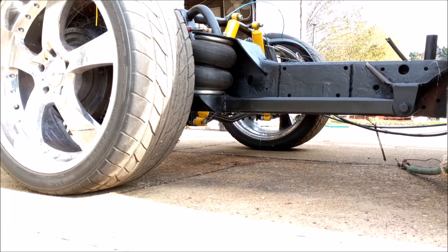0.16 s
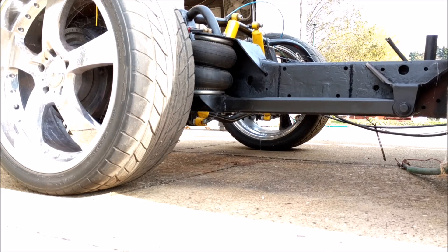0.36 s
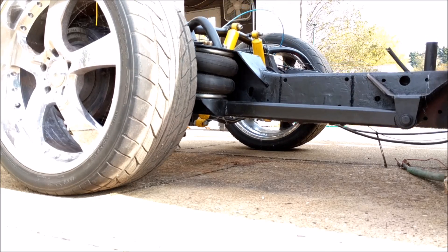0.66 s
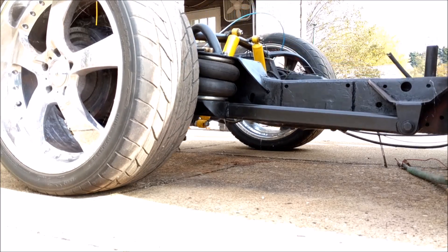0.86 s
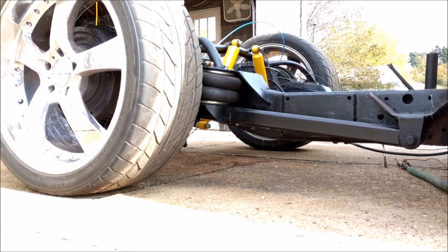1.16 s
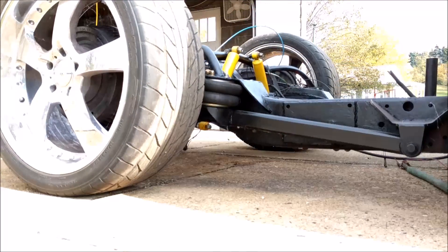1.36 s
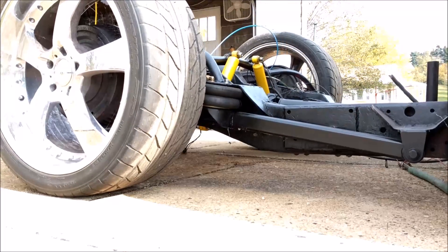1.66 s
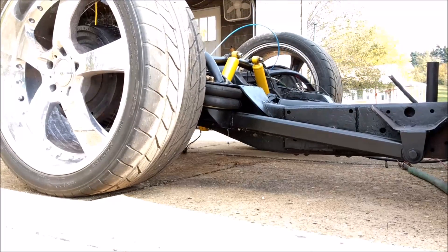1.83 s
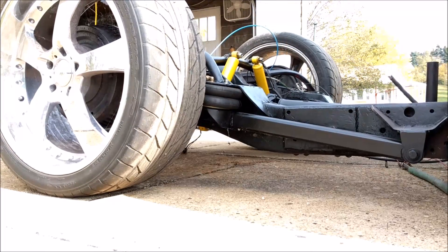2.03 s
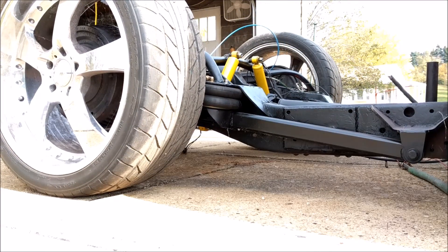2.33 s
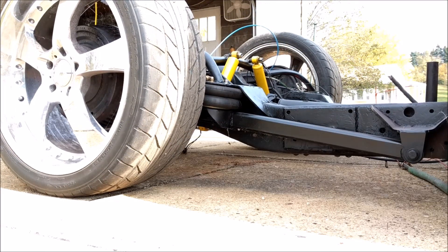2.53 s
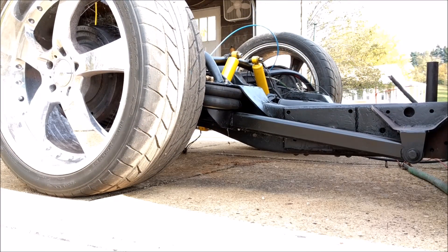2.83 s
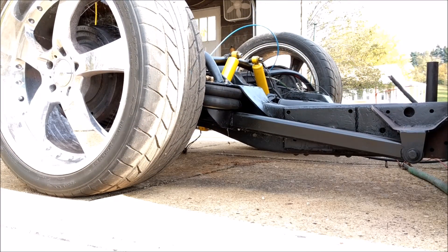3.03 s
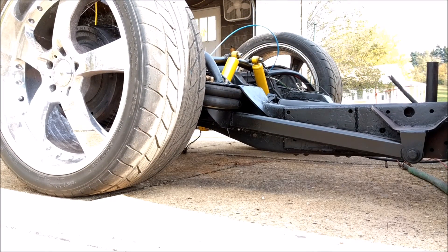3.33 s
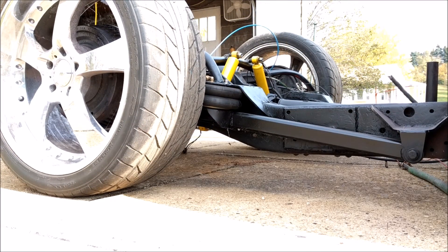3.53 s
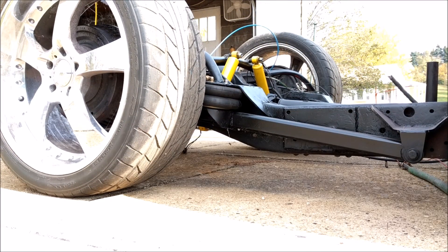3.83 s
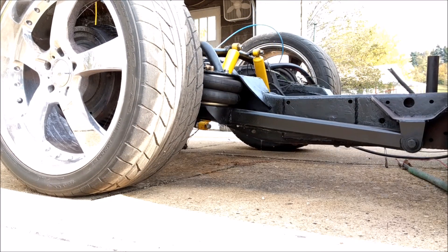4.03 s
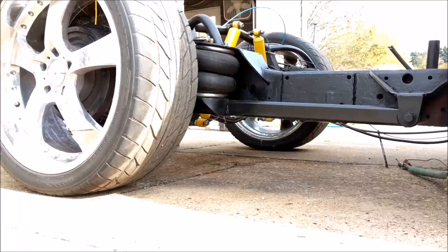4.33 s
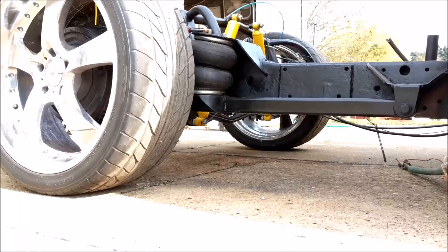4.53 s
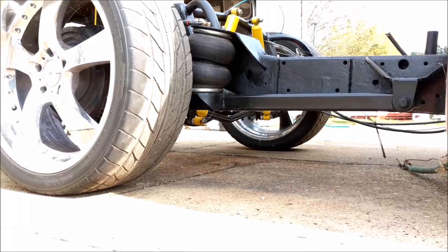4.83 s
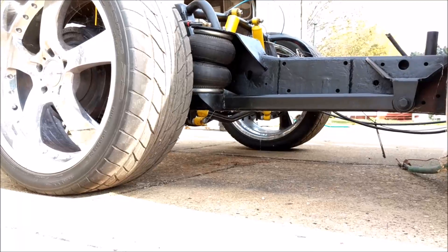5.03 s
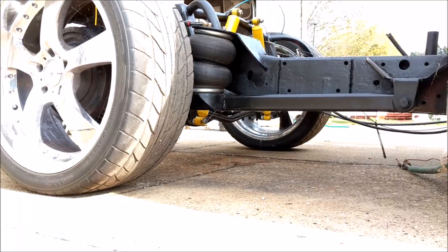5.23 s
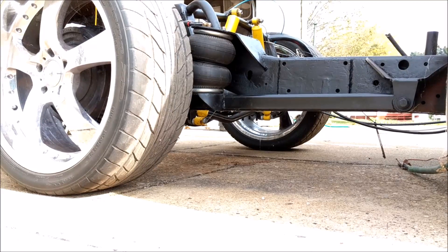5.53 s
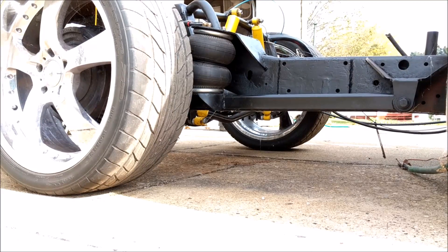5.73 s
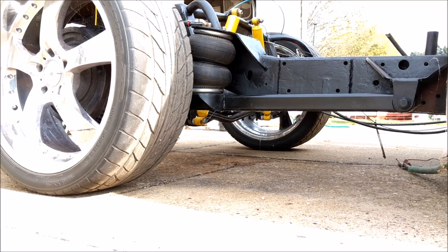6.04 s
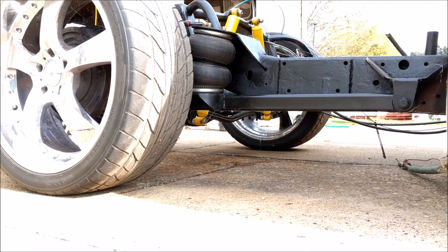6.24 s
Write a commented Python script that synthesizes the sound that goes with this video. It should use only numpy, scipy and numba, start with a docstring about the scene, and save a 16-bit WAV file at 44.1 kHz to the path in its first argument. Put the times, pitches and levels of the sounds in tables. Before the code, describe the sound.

Outdoors on a driveway, close to one microphone, a solenoid valve clicks and compressed air escapes from truck air bags in a harsh rush lasting over a second. The bare steel frame thuds onto the ground, bounces and rattles. Quiet distant traffic follows, with faint ticks. Then a hard valve clack and an explosive blast open a shorter whistling inrush that weakens quickly and bleeds off into quiet.

```python
"""A driveway: a bare truck frame rests on air bags, close to one microphone.
A valve dumps the bags in a long rush and the frame thuds down; later a valve bursts open and air whistles
into the bags as the frame rises. The air is filtered noise with moving resonances; the thud and the valve
clacks are decaying sine modes with a noise rattle. Faint ticks and distant traffic are shaped noise.
Gain control acts a moment late, so loud starts overload."""
import sys
import numpy as np
from scipy import signal
from scipy.fft import rfft, irfft
from scipy.io import wavfile
from scipy.ndimage import uniform_filter1d
from numba import njit

SR = 44100
rng = np.random.default_rng(int(sys.argv[2]) if len(sys.argv) > 2 else 0)


def gain_from_decibels(decibels):
    """Convert decibel values to linear amplitude factors."""
    exponent = np.asarray(decibels, float) / 20
    return 10 ** exponent


def persist_wave(psi):
    """Save psi, clipped to +-1, as 16-bit WAV."""
    counts = np.round(np.clip(psi, -1, 1) * 32767).astype(np.int16)
    wavfile.write(sys.argv[1], SR, np.atleast_2d(counts).T)


N = 281799  # samples
T = np.arange(N) / SR  # time [s]


def unit(x):
    """Scale to rms 1."""
    return x / np.sqrt(np.mean(x ** 2))


def colour(points):
    """Noise of rms 1 whose spectrum follows (frequency [Hz], relative level [dB]) points."""
    hz, db = np.transpose(points)
    f = np.fft.rfftfreq(N, 1 / SR) + 1
    shape = gain_from_decibels(np.interp(np.log(f), np.log(hz), db))
    return unit(irfft(rfft(rng.standard_normal(N)) * shape, N))


@njit
def svf(x, hz, width):
    """Band-pass filter with a moving centre and gain 1 at the centre."""
    y, band, low = np.empty(len(x)), 0., 0.
    for i in range(len(x)):
        g, k = np.tan(np.pi * hz[i] / SR), width / hz[i]
        v = (band + g * (x[i] - low)) / (1 + g * (g + k))
        band, low, y[i] = 2 * v - band, low + 2 * g * v, k * v
    return y


def walk(rate):
    """Slow random wander: levels held for 1 / rate seconds, smoothed twice; spread near 1."""
    hold = int(SR / rate)
    steps = np.repeat(rng.standard_normal(N // hold + 1), hold)
    return unit(uniform_filter1d(uniform_filter1d(steps, hold), hold)[:N])


def ramp(start_s, end_s):
    """0 before the start, 1 after the end, a straight line between."""
    return np.clip((T - start_s) / (end_s - start_s), 0, 1)


def flow(valve, motion):
    """The valve snaps open, the flow weakens as pressures even out, then it shuts and the line bleeds off."""
    open_s, shut_s, db, loss_db = valve
    attack_s, bend, shutting_s, leak_db, leak_t60 = motion
    opening = ramp(open_s, open_s + attack_s) ** 4
    weakening = gain_from_decibels(db - loss_db * ramp(open_s, shut_s) ** bend)
    after = np.maximum(T - shut_s, 0)
    shutting = (1 - gain_from_decibels(leak_db)) * np.exp(-after / shutting_s)
    leak = gain_from_decibels(leak_db) * 1000 ** (-after / leak_t60)
    return weakening * opening * (shutting + leak)


def rush(strength, progress, spectrum, modes, flutter_db, drift):
    """Turbulent air: broad hiss plus wavering resonances; colour and pitch change with progress (0 to 1)."""
    hz, *colours = np.transpose(spectrum)
    halves, thirds = np.arange(3) / 2, np.arange(4) / 3
    out = np.zeros(N)
    for k, dbs in enumerate(colours):
        # fade from one hiss to the next by power
        share = np.sqrt(np.interp(progress, halves, np.arange(3) == k))
        out += share * colour(np.c_[hz, dbs])
    for width, *row in modes:
        centre = np.interp(progress, thirds, row[:4]) * (1 + drift * walk(9.7))
        # two passes leave dark valleys between the resonances
        once = svf(rng.standard_normal(N), centre, 1. * width)
        ring = unit(svf(once, centre, 1. * width))
        out += ring * gain_from_decibels(np.interp(progress, thirds, row[4:]) + flutter_db * walk(25))
    return unit(out) * strength


# Dump valve: (opens [s], shuts [s], level at opening [dB], loss of level until it shuts [dB])
DUMP_VALVE = (.3845, 1.672, 4.8, 13)
# How the dumped air moves: (attack [s], bend of the loss [1 = even, less = early], shutting [s],
# leak after shutting [dB], leak time to fall 60 dB [s])
DUMP_FLOW = (.0105, 1.15, .006, -10.5, .41)
# Colour of the escaping jet: (frequency [Hz], start [dB], half way [dB], end [dB])
JET = [(150, -38, -37, -42), (330, -17, -17, -20.5), (550, -14, -9.5, -15), (900, -14.5, -8.5, -11),
       (1300, -12.5, -9.5, -7), (1800, -13, -3, -5), (2800, -3.5, -2, -0.5), (4300, -3, -2.5, -1),
       (6400, -2, -15, -5), (7220, -5.5, -9.5, -14), (9360, -5.5, -8, -10), (10800, -11, -11.5, -16.5),
       (12760, -2.5, -8, -8), (16000, -4, -4.5, -13.5)]
# Exhaust port resonances: (width [Hz], centre at the start [Hz], early [Hz], late [Hz], end [Hz])
PORT = [(260, 2350, 2380, 2400, 2330), (250, 1850, 1850, 1950, 1950), (300, 3250, 3150, 3050, 2900),
        (300, 3700, 3700, 3550, 3550), (300, 3950, 4150, 4150, 4050), (300, 4750, 4750, 4620, 4600),
        (380, 5650, 5550, 5600, 5500), (450, 6250, 6200, 6400, 6450), (900, 9000, 8900, 9200, 9300)]
# Their strength: (start [dB], early [dB], late [dB], end [dB])
PORT_DB = [(-27, -9.5, -12.5, -13.5), (-24, -18, -18, -15.5), (-12.5, -19, -17, -10),
           (-14.5, -13, -13, -12), (-12, -10, -13.5, -15), (-19.5, -17, -13, -14.5),
           (-13.5, -11.5, -14, -15.5), (-12, -15.5, -18, -15.5), (-12, -15.5, -18, -23)]
FRAME_DOWN_S = 1.62  # the bags are empty when the frame touches down


def dump():
    """Air leaves the bags through the exhaust port, hissing and ringing it as they empty."""
    emptied = ramp(DUMP_VALVE[0], FRAME_DOWN_S)
    port = np.c_[PORT, PORT_DB]
    return rush(flow(DUMP_VALVE, DUMP_FLOW), emptied, JET, port, flutter_db=2.5, drift=.012)


# Fill valve: (opens [s], shuts [s], level at opening [dB], loss of level until it shuts [dB])
FILL_VALVE = (3.955, 4.835, -6, 25.5)
# How the filling air moves: (attack [s], bend of the loss [1 = even, less = early], shutting [s],
# leak after shutting [dB], leak time to fall 60 dB [s])
FILL_FLOW = (.05, .55, .03, -9, .38)
# Colour of the inrush: (frequency [Hz], start [dB], half way [dB], end [dB])
INRUSH = [(199, -27, -34, -37), (395, -4, -25, -20), (600, -21, -31, -23), (1020, -18.5, -32.5, -22),
          (1500, -9.5, -6.5, -9.5), (2500, -9.5, -15.5, -8.5), (3400, 1.5, -3.5, -12),
          (6540, -7, -8.5, -12), (7600, -5.5, -13, -17.5), (9330, -7, -8, -11.5), (11300, -9.5, -14.5, -19),
          (16000, -12, -18.5, -30)]
# Hose and bag resonances: (width [Hz], centre at the start [Hz], early [Hz], late [Hz], end [Hz])
HOSE = [(120, 1150, 1330, 1410, 1410), (120, 2020, 2220, 2250, 2200), (160, 1850, 1950, 1950, 2020),
        (290, 2800, 3150, 3180, 2950), (330, 4100, 4300, 4450, 4500), (220, 5100, 5000, 4950, 4950),
        (230, 5800, 5550, 5400, 5350), (240, 6500, 6150, 6400, 6400), (300, 7600, 7250, 7200, 7200),
        (120, 800, 800, 780, 720)]
# Their strength: (start [dB], early [dB], late [dB], end [dB])
HOSE_DB = [(-18, -12, -9.5, -8), (-23, -0.5, 3, -8), (-21.5, -13.5, -15.5, -3), (-6.5, 1, -1, -9),
           (-9, -12.5, -10, -11), (-10.5, -14, -14.5, -13), (-17.5, -12.5, -10, -14.5), (-13, -8, -16, -15),
           (-12.5, -14.5, -18, -19.5), (-34, -32.5, -25.5, -18)]
BAGS_UNFOLD_S = .11  # wait after the valve opens before the bags swell and the hose tones form


def fill():
    """Air whistles through hose and bags, whose resonances shift as the bags swell."""
    # the power below 1 makes the bags swell fastest at first
    filled = ramp(FILL_VALVE[0] + BAGS_UNFOLD_S, FILL_VALVE[1]) ** .85
    hose = np.c_[HOSE, HOSE_DB]
    return rush(flow(FILL_VALVE, FILL_FLOW), filled, INRUSH, hose, flutter_db=1.8, drift=.007)


# First burst of tank pressure: (opens [s], shuts [s], level at opening [dB], loss until it shuts [dB])
FILL_BLAST = (3.9545, 3.988, 4, .7)
# How the burst moves: (attack [s], bend of the loss [1 = even, less = early], shutting [s],
# leak after shutting [dB], leak time to fall 60 dB [s])
BLAST_FLOW = (.003, 1.1, .009, -12, .6)
# Colour of the burst: (frequency [Hz], level [dB])
BLAST_COLOUR = [(40, -9), (120, -13.5), (250, -19.5), (800, -25), (1100, -17.5), (1700, -20.5),
                (2500, -21.5), (3500, -8), (6500, -7.5), (10500, -8.5), (16000, -9.5)]


def blast():
    """Tank pressure bursts through the opening fill valve, ringing its body near 3 kHz."""
    body = unit(svf(rng.standard_normal(N), np.full(N, 3000.), 500.))
    return (colour(BLAST_COLOUR) + gain_from_decibels(-3.5) * body) * flow(FILL_BLAST, BLAST_FLOW)


def height():
    """Frame height: sinks from 1 to 0 in the dump, lifts to 1 with the fill, then settles lower."""
    top_s = FILL_VALVE[0] + .49  # the lift takes 0.49 s
    # 0.24 of the height is lost over 0.3 s after the overshoot
    lift = ramp(FILL_VALVE[0], top_s) - .24 * ramp(top_s, top_s + .3)
    return 1 - ramp(DUMP_VALVE[0], FRAME_DOWN_S) + lift


# Nearby frame, wheel, ground and wall return the air noise:
# (delay with the frame down [ms], delay with it up [ms], level [dB])
ECHOES = [(2.3, 2.36, -21), (3.7, 3.6, -21.5), (5.9, 6.05, -13.5), (8.3, 8.15, -16), (12.7, 15, -14.5)]


def echoes(x):
    """Short reflections comb the hiss into fine ridges, which slide as the frame moves."""
    out, up = x.copy(), height()
    for k, (down_ms, up_ms, db) in enumerate(ECHOES):
        delay_s = (down_ms + (up_ms - down_ms) * up) / 1000
        out += (-1) ** k * gain_from_decibels(db) * np.interp(T - delay_s, T, x)  # every second echo is inverted
    return out


def strike(blows, modes, rattle_db, rattle_s, swell):
    """Each blow is a smooth push that rings the modes; longer contact leaves only the low ones."""
    out, t = np.zeros(N), T[:SR]
    # every blow excites the modes a little differently
    strength = gain_from_decibels(2.0 * rng.standard_normal((len(blows), len(modes))))
    for (s, db, ms), share in zip(blows, strength):
        ring = np.zeros(SR)
        for g, (hz, mode_db, t60) in zip(share, modes):
            # a mode builds up over cycles (swell), so the lows come late
            build_up = 1 - np.exp(-t * hz / swell)
            ring += g * gain_from_decibels(mode_db) * np.sin(2 * np.pi * hz * t) * build_up * 1000 ** (-t / t60)
        # loose parts rattle along
        rattle = colour([(80, -14), (250, -1), (900, -5.5), (2000, -29.5), (6000, -49)])[:SR]
        ring += gain_from_decibels(rattle_db) * rattle * 1000 ** (-t / rattle_s)
        push = np.hanning(int(ms * SR / 1000) + 3)
        ring = np.convolve(ring, push)[:SR]
        i = int(s * SR)
        out[i:i + SR] += gain_from_decibels(db) * ring / np.abs(ring).max()
    return out


# The frame lands and bounces: (time [s], peak of this blow alone [dB], contact [ms])
LANDING = [(1.619, -1, 0.32), (1.637, -7.5, 0.65), (1.65, -8.5, 3.14), (1.678, -8, 3.78),
           (1.775, -22.5, 2.1), (1.84, -25, 4)]
# Modes of the steel frame: (frequency [Hz], relative level [dB], time to fall 60 dB [s])
FRAME = [(90, -7, .9), (125, -1, .45), (165, -3, .3), (199, -13, 1.9), (270, -8, .45), (325, -10, .25),
         (420, -3, .13), (540, -5, .15), (710, -6, .12), (765, 5, .09), (920, -6, .1), (1100, -12, .15)]


def landing():
    """The steel frame hits the ground and bounces, ringing while loose parts shake."""
    return strike(LANDING, FRAME, rattle_db=-1.5, rattle_s=.42, swell=2.3)


# Solenoid plungers strike: (time [s], peak of this blow alone [dB], contact [ms])
PLUNGERS = [(.3925, -9, .8), (3.9548, 0, 1.1)]
# Modes of the valve block: (frequency [Hz], relative level [dB], time to fall 60 dB [s])
VALVE = [(110, -15, .15), (395, 0, .07), (690, -26, .06), (1080, -16, .09), (1330, -20, .07)]


def plungers():
    """Solenoid plungers knock the valve block, which rings briefly."""
    return strike(PLUNGERS, VALVE, rattle_db=-19, rattle_s=.12, swell=.6)


# Faint dry ticks: (time [s], starting level [dB])
TICKS = [(2.2129, -40), (2.5406, -42), (5.5553, -36), (6.0526, -41)]


def ticks():
    """Treble noise clicks that die away within milliseconds."""
    env = np.zeros(N)
    for s, db in TICKS:
        env += gain_from_decibels(db) * (T >= s) * np.exp(-np.maximum(T - s, 0) / .0015)
    return env * colour([(3000, -30), (8000, 10), (12000, 13), (16000, 14)])


# Deep traffic rumble: (frequency [Hz], relative level [dB])
RUMBLE = [(25, -27), (45, -5.5), (75, 7.5), (110, 0.5), (200, -3), (320, -40), (600, -75)]
# Tyre roar: (frequency [Hz], relative level [dB])
ROAR = [(70, -34), (130, -11.5), (250, -1), (450, -7), (750, -16), (1500, -43)]
# Still outdoor air and microphone hiss: (frequency [Hz], relative level [dB])
AIR = [(240, -29.5), (400, -23), (750, -3), (880, 2), (1000, 0), (1600, -1), (2400, -8), (4000, -14),
       (7000, -23.5), (11000, -29), (15000, -23)]


def street():
    """Distant traffic: rumble and tyre roar waver and fade, a far car passes; the air hiss is smooth."""
    rumble = colour(RUMBLE) * gain_from_decibels(-34 - .85 * T + 1.3 * walk(7.8))  # fades 0.85 dB per second
    # nearest at 2.5 s; its power halves 0.55 s away from that
    car = gain_from_decibels(-38.5) / np.hypot(1, (T - 2.5) / .55)
    general = gain_from_decibels(-43 - 1.1 * T)  # fades 1.1 dB per second
    roar = colour(ROAR) * np.hypot(general, car) * gain_from_decibels(1.4 * walk(3.3))
    return rumble + roar + gain_from_decibels(-48.5) * colour(AIR)


def scene():
    """All sources reach one microphone; both channels are the same."""
    air = dump() + fill() + blast()
    mix = echoes(air) + landing() + plungers() + ticks() + street()
    return np.tile(mix, (2, 1))


@njit
def follow(x, attack, release):
    """Level follower with separate speeds for rising and falling."""
    e, out = 0., np.empty(len(x))
    for i in range(len(x)):
        e += (x[i] - e) * (attack if x[i] > e else release)
        out[i] = e
    return out


def low_pass(x):
    """Removes everything above the highest recorded frequency."""
    return signal.sosfilt(signal.butter(12, 16340, fs=SR, output="sos"), x)


def record(dry):
    """Gain control turns loud air down a moment late, so the first instants overload; the top is cut."""
    power = uniform_filter1d(dry[0] ** 2, size=441)  # 10 ms average
    attack_s, release_s = .033, .068
    level = follow(np.sqrt(power + 1e-12), 1 / (attack_s * SR), 1 / (release_s * SR))
    # above -19 dB, each extra dB is turned down by 0.6 dB
    gain = np.minimum(1, (gain_from_decibels(-19) / (level + 1e-9)) ** 0.6)
    overloaded = np.clip(dry * gain, -1, 1)
    top_cut = signal.ellip(14, .2, 60, 15680, fs=SR, output="sos")  # low-pass at 15680 Hz
    finished = signal.sosfilt(top_cut, overloaded)
    return low_pass(finished)


dry = scene()
out = record(dry)
persist_wave(out)
```